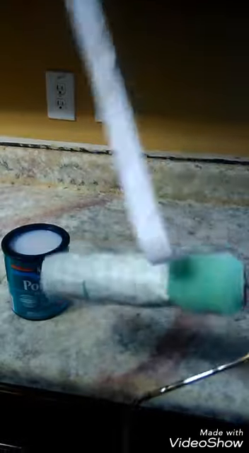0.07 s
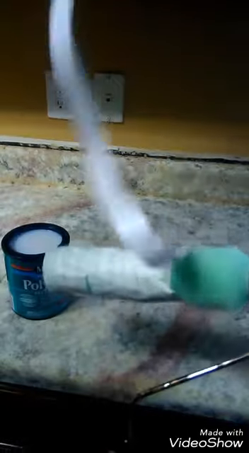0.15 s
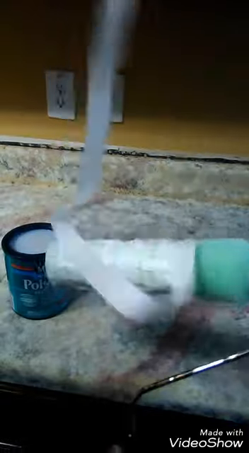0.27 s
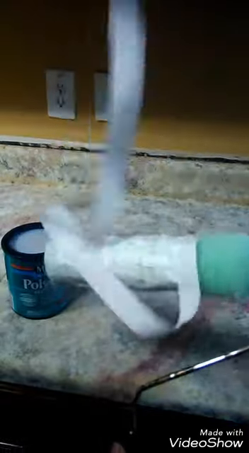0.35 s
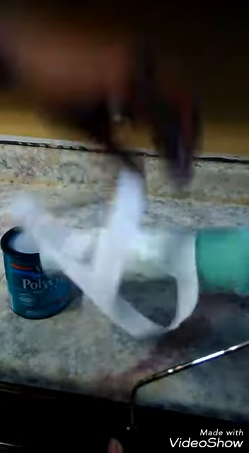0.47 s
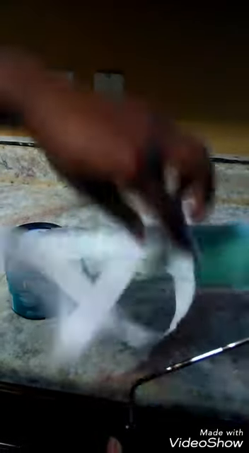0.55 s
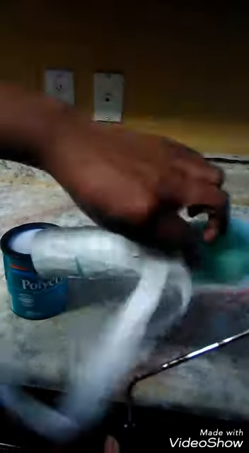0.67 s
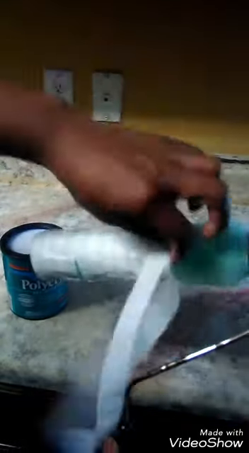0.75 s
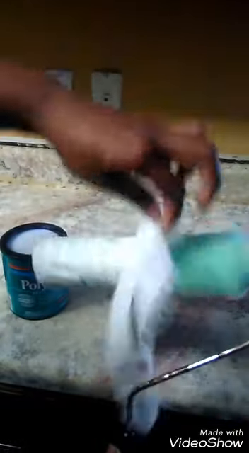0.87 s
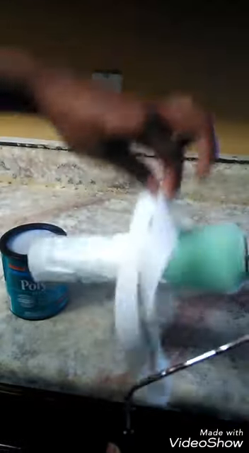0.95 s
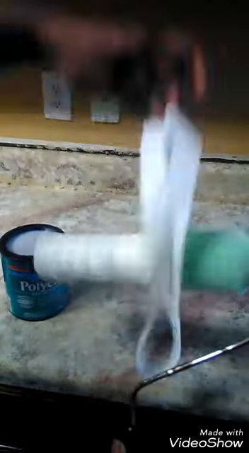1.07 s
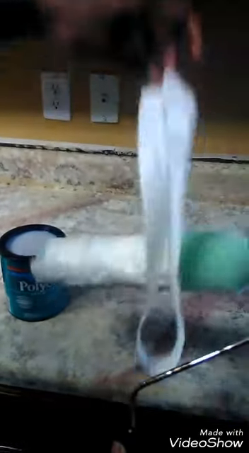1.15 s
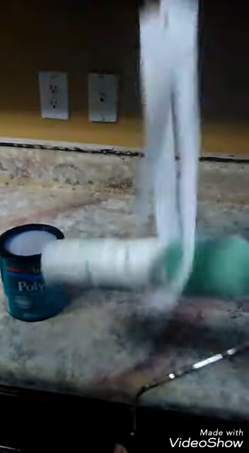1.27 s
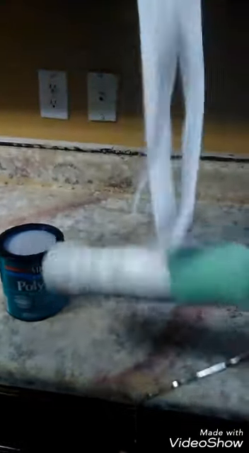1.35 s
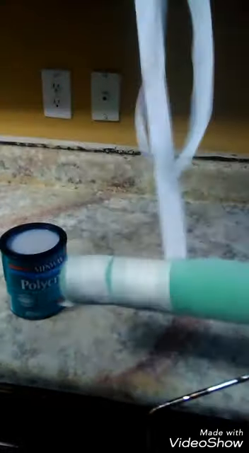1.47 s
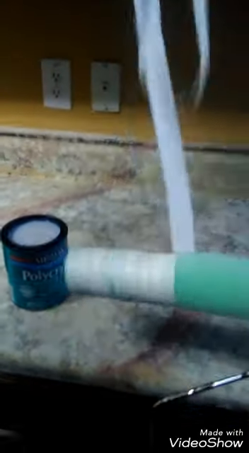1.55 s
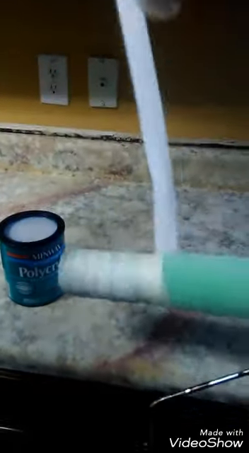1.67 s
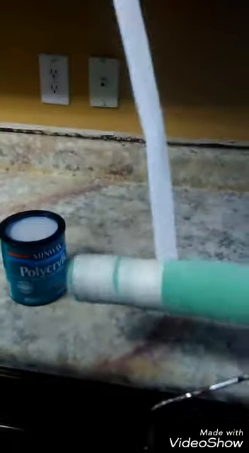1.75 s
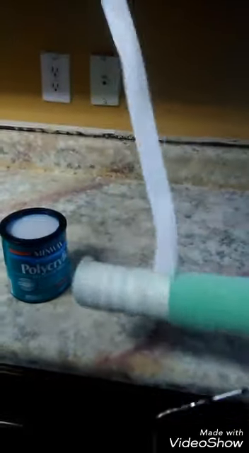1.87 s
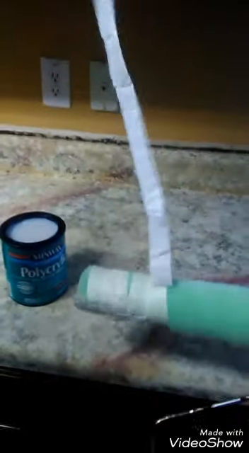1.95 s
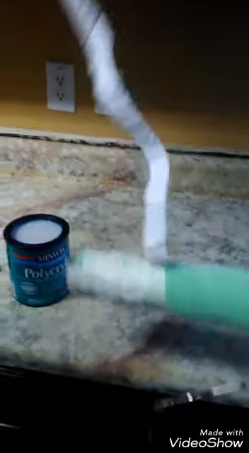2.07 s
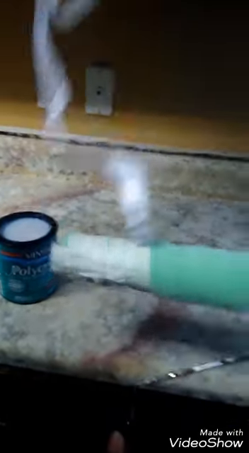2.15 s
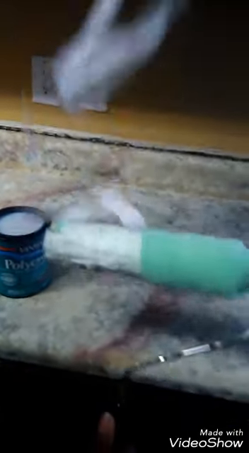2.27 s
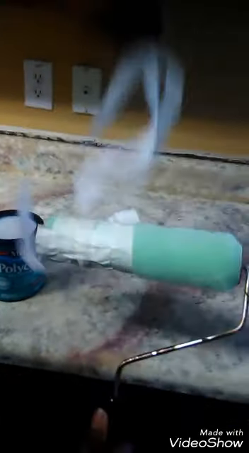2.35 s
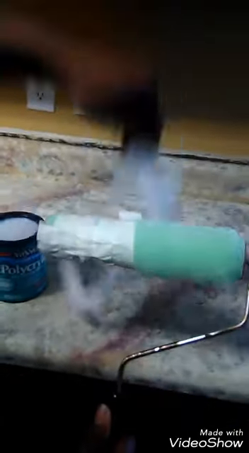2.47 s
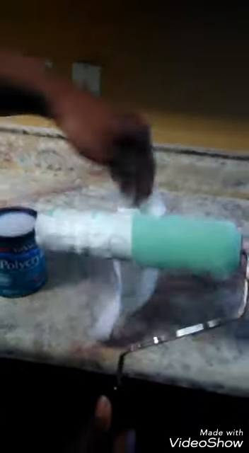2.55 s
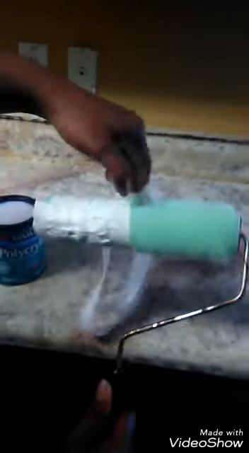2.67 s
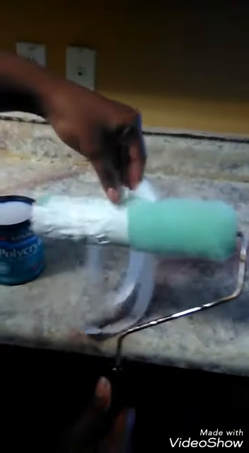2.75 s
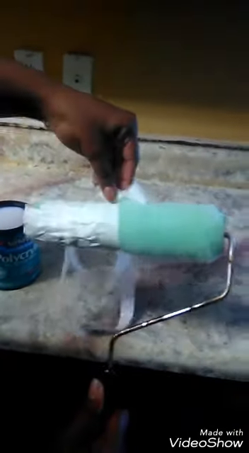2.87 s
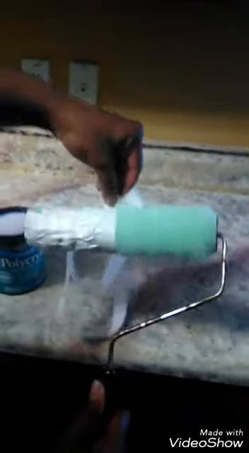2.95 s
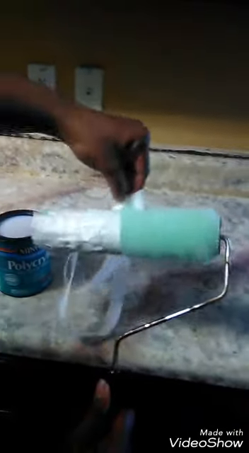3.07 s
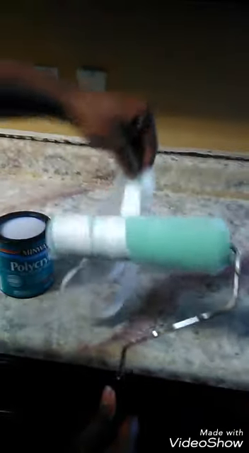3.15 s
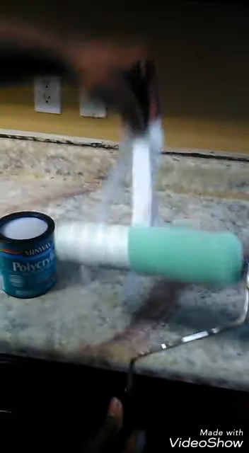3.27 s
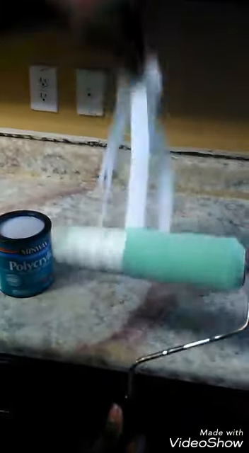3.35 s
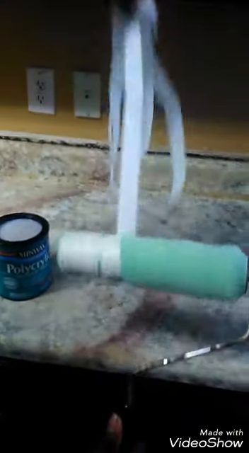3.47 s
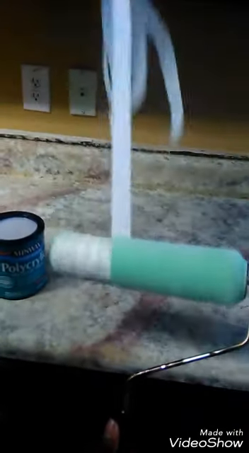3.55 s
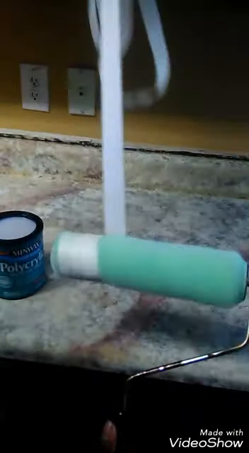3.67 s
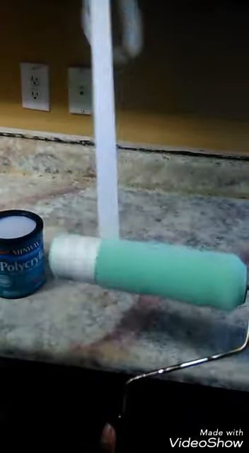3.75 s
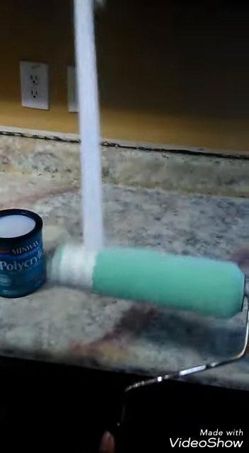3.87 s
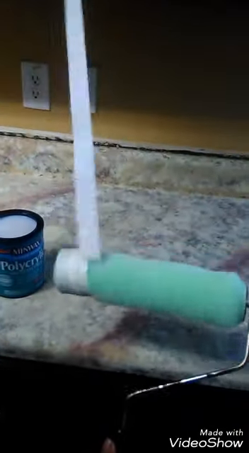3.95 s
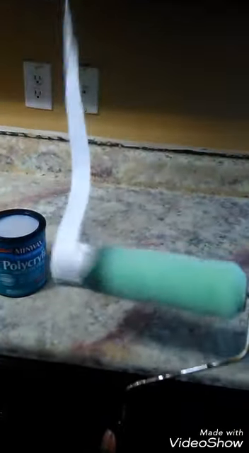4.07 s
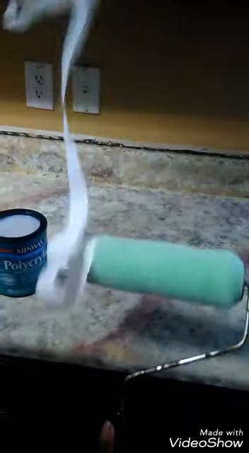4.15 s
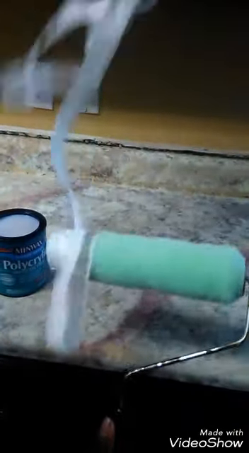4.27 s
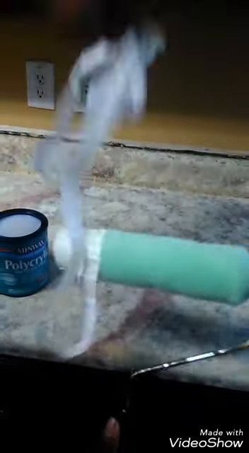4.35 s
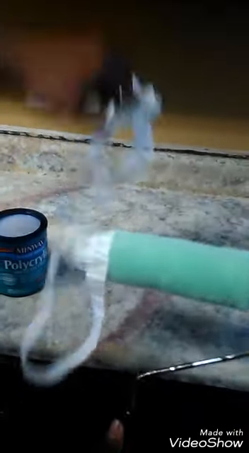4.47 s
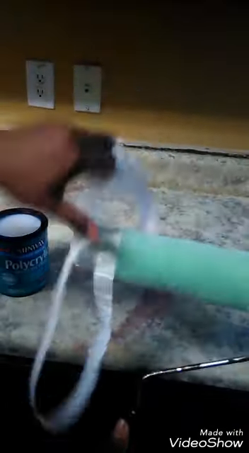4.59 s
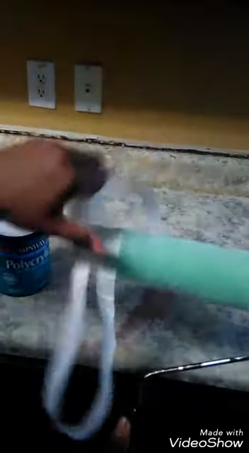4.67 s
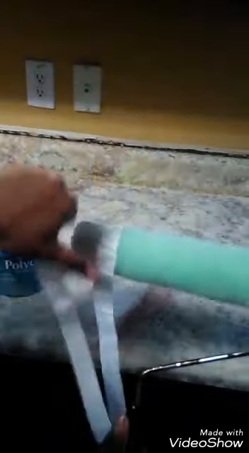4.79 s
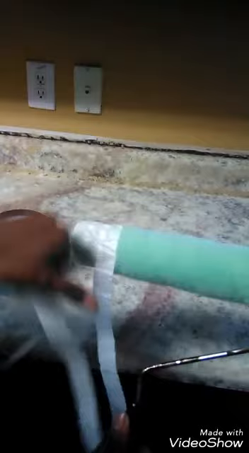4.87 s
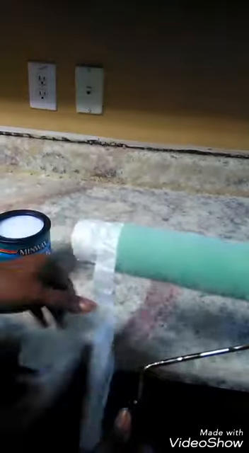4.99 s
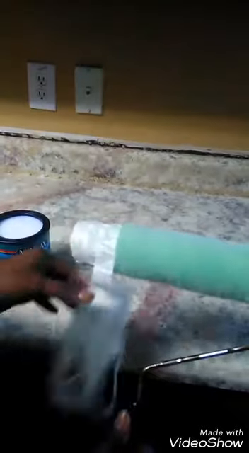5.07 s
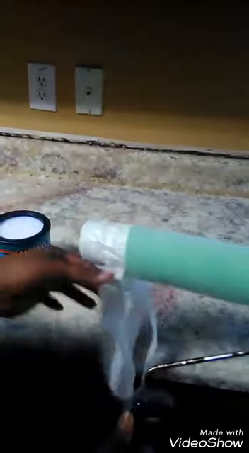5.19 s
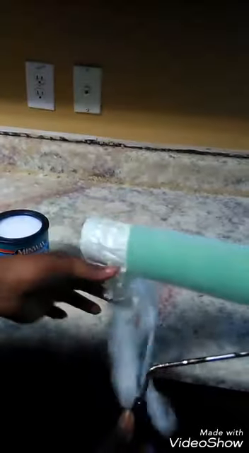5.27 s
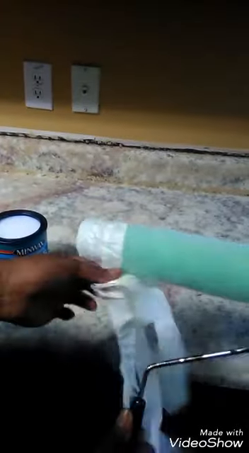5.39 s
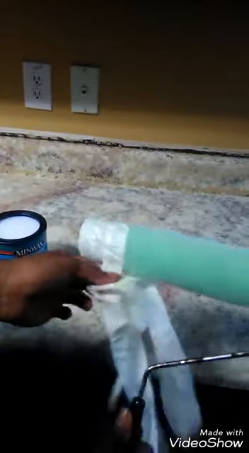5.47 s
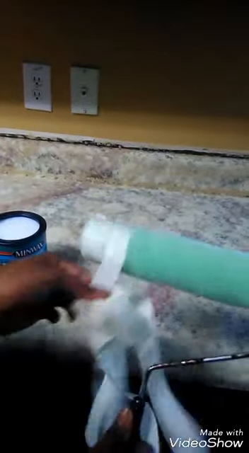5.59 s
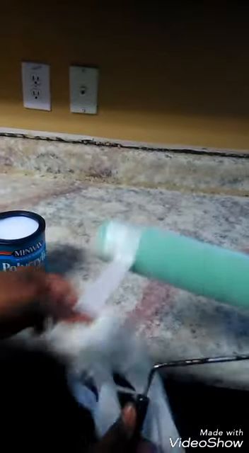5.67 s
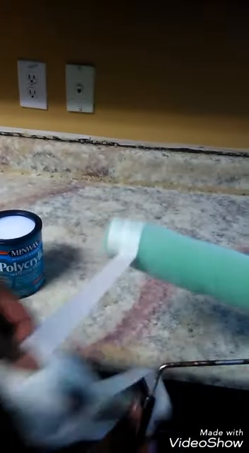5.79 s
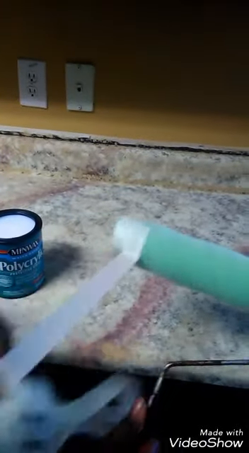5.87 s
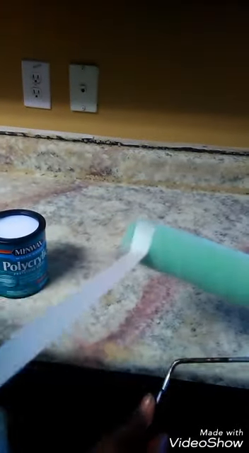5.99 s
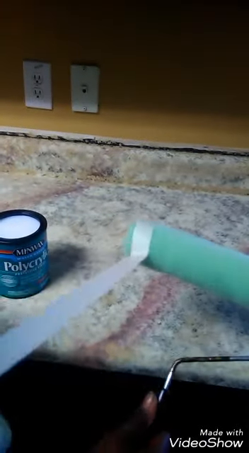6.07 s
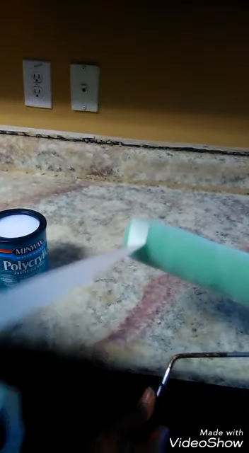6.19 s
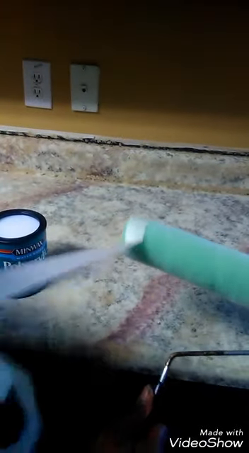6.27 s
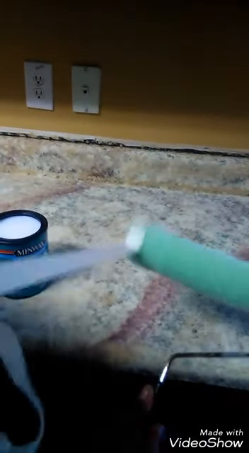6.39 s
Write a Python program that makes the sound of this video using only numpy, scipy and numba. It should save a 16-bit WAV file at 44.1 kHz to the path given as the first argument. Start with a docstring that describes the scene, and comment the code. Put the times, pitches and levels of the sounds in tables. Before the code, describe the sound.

Close up in a small quiet room, adhesive tape is torn from the fluffy cover of a paint roller. A brief rip comes first, then two rasping pulls of nearly a second each, and a last one that runs to the end. Between them, loose tape rustles, ticks and crinkles while the roller knocks softly on its wire frame. Faint hiss lies beneath.

```python
"""Tape is pulled off the fluffy cover of a paint roller in four rasps, the first short, over a counter in a small
quiet room. Nap fibres snap free of the glue in dense, uneven bursts (stick-slip) and excite the resonances of the
hollow core; one effort curve drives each pull. Loose tape rustles and ticks as the hand takes a new grip, with short
hollow notes; creases pop as damped impulses, and the roller knocks, hums and rubs on its wire frame."""
import sys
import numpy as np
from scipy import signal
from scipy.fft import rfft, irfft
from scipy.io import wavfile
from scipy.ndimage import uniform_filter1d
from numba import njit

SR = 44100
rng = np.random.default_rng(int(sys.argv[2]) if len(sys.argv) > 2 else 0)


def int16_out(signal):
    """Quantize to a 16-bit WAV file."""
    q = np.round(np.clip(np.atleast_2d(signal).T, -1, 1) * 32767)
    wavfile.write(sys.argv[1], SR, q.astype(np.int16))


N = 283504
TIME = np.arange(N) / SR


def undb(db):
    """Logarithmic levels: decibels to amplitude gain."""
    return 10 ** (np.asarray(db) / 20)


def unit(x):
    """Normalisation: scale to rms 1."""
    return x / np.sqrt(np.mean(x ** 2))


def colour(x, points):
    """Minimum-phase filtering: the cepstrum is folded so the (f/Hz, level/dB) response is causal."""
    hz, db = np.transpose(points)
    grid = np.fft.rfftfreq(4096, 1 / SR) + 1  # +1 Hz avoids log(0)
    cepstrum = irfft(np.log(undb(np.interp(np.log(grid), np.log(hz), db))))
    cepstrum[1:2048] *= 2
    cepstrum[2049:] = 0
    impulse_response = irfft(np.exp(rfft(cepstrum)))
    return signal.fftconvolve(x, impulse_response)[:len(x)]


def ring(x, hz, width):
    """Simple resonance: a second-order peak with gain 1 at its centre."""
    b, a = signal.iirpeak(hz, hz / width, fs=SR)
    return signal.lfilter(b, a, x)


def resonate(x, modes):
    """Modal superposition: a body's response is the sum of its (f/Hz, width/Hz, level/dB) resonances."""
    return sum(undb(db) * ring(x, hz, width) for hz, width, db in modes)


@njit
def glide(x, hz, width):
    """Time-varying resonance: a state-variable filter whose centre moves."""
    y, band, low = np.empty(len(x)), 0., 0.
    for i in range(len(x)):
        g, k = np.tan(np.pi * hz[i] / SR), width / hz[i]
        v = (band + g * (x[i] - low)) / (1 + g * (g + k))
        band, low, y[i] = 2 * v - band, low + 2 * g * v, k * v
    return y


def wander(rate):
    """Random modulation: normally distributed values joined by straight lines, rate of them a second."""
    return np.interp(TIME * rate, np.arange(N), rng.standard_normal(N))


def crackle(rate, spread_db, count=N):
    """Random impulse process: clicks of either sign and log-normal size, a few of them strong; rms 1."""
    happens = rng.random(count) < rate / SR
    size = undb(spread_db * np.minimum(rng.standard_normal(count), 2.5))
    return unit(happens * size * rng.choice([-1, 1], count) + 1e-12)


def place(x, pan_db):
    """Level-difference stereo: left exceeds right by pan_db."""
    return x * undb(np.array([pan_db, -pan_db]).reshape(2, -1) / 2)


def add(out, s, x):
    """Superposition: mix a short sound in at time s."""
    i = max(int(s * SR), 0)
    out[..., i:i + x.shape[-1]] += x[..., :N - i]


RISE_SHARE, SWELL_DEPTH_DB = 0.41, 23.5  # share of its length a swell rises for; its ends lie this far under its peak


def swells(rows):
    """Power summation: a gain climbs to each (t/s, length/s, level/dB) peak and falls linearly in dB after it."""
    power = np.zeros(N)
    for s, length, db in rows:
        near = slice(max(int((s - length) * SR), 0), int((s + 2 * length) * SR))
        u = (TIME[near] - s) / length
        fall = np.where(u < 0, (u / RISE_SHARE) ** 2, u / (1 - RISE_SHARE))
        power[near] += undb(db - SWELL_DEPTH_DB * fall) ** 2
    return np.sqrt(power)


def limited(gain, limit_db):
    """Saturation: a gain levels off as it nears the limit."""
    return gain / np.hypot(1, gain / undb(limit_db))


def fibres(rate, spread_db, spectrum, shared=0.65):
    """Partial coherence: tiny snaps, some alike in both microphones, others independent in each."""
    both, left, right = (unit(colour(crackle(rate, spread_db), spectrum)) for _ in range(3))
    return shared * both + np.sqrt(1 - shared ** 2) * np.array([left, right])


# resonances of the roller's hollow core: f/Hz, width/Hz, relative level/dB
CORE_MODES = [(146, 37, -27), (197, 140, -0.5), (296, 38, 8), (354.4, 15, 11), (416, 120, 5.5),
              (650, 110, -21), (790, 37, -34.5), (975, 43, -3.5)]


def core(x):
    """Forced vibration: the hollow core rings with whatever shakes it, within a 125-1600 Hz band."""
    band = signal.butter(2, [125, 1600], "band", fs=SR, output="sos")
    return signal.sosfilt(band, resonate(x, CORE_MODES))


# effort, one list for each pull: t/s, level/dB
PULL_EFFORTS = [
    [(0.0, -26), (0.01, -28), (0.076, -34), (0.096, -57), (0.13, -54)],
    [(1.0, -42), (1.012, -45), (1.09, -33), (1.32, -31.5), (1.376, -26.5), (1.554, -29.5), (1.592, -28),
     (1.692, -31), (1.876, -25.5), (1.976, -26.5), (2.022, -28.5), (2.048, -43), (2.12, -75)],
    [(3.06, -38), (3.074, -75), (3.166, -30.5), (3.194, -45), (3.2, -29), (3.452, -33), (3.494, -29),
     (3.586, -30), (3.598, -27.5), (3.822, -35), (4.006, -24.5), (4.06, -38), (4.13, -62)],
    [(5.6, -31), (5.66, -33), (5.718, -26.5), (5.742, -25), (5.862, -30), (6.052, -28), (6.248, -42.5),
     (6.328, -35.5), (6.38, -36.5), (6.429, -30.5)],
]
# strip in each pull: goes taut t/s, goes slack t/s, first note f/Hz, last note f/Hz, roller's note f/Hz,
# rumble level/dB, fizz level/dB, strength of its note level/dB (levels relative)
PULL_STRIPS = [(-.03, 0.093, 232, 210, 347, -17, 0.5, 0), (1.05, 2.03, 215, 185, 371, -15, -1, -1),
               (3.225, 3.997, 405, 180, 421, -14, 1, -5.5), (5.671, 6.43, 415, 231, 352, -11, 1.5, -5.5)]


def efforts():
    """Driving force: the effort in dB, a gate open during the pulls, and the strip's values in the current pull."""
    s, db = np.vstack(PULL_EFFORTS).T
    active = sum((TIME >= pull[0][0]) & (TIME <= pull[-1][0]) for pull in PULL_EFFORTS) > 0
    gate = uniform_filter1d(active * 1., size=900)
    current = sum(TIME >= pull[0][0] for pull in PULL_EFFORTS[1:])
    return np.interp(TIME, s, db), gate, np.array(PULL_STRIPS)[current].T


def pings(count=2600, size=300, cycles=5.6, low_hz=3000, high_hz=10500, spread_db=17.5, scatter_db=22.0):
    """Damped oscillation: single tufts tear free, each with its own pitch, strength and place; rms 1."""
    out, t = np.zeros((2, N)), TIME[:size]
    for when, pitch, strength, across in rng.random((count, 4)):
        hz = low_hz + (high_hz - low_hz) * pitch
        ping = undb(spread_db * strength ** 2) * np.sin(2 * np.pi * hz * t) * np.exp(-t * hz / cycles)
        add(out, when * N / SR, place(ping, scatter_db * (2 * across - 1)))
    return unit(out)


# relative spectra of the fibres' rasp, their treble fizz, the taut strip's drumming and cracking glue strings:
# f/Hz, level/dB
RASP_SPECTRUM = [(100, -39.5), (400, -9.5), (650, -6.5), (1050, -6), (1400, -4.5), (2150, 2.5), (2900, 0),
                 (3800, 2), (4900, -1), (6000, 2), (8000, -12), (14500, -14.5)]
FIZZ_SPECTRUM = [(2000, -73.5), (5000, -10.5), (7000, 0), (9000, 1), (11000, -5), (14500, -11.5)]
DRUM_SPECTRUM = [(200, -43.5), (600, -8), (780, -10.5), (960, -2.5), (1100, 1), (1350, -5.5), (2500, -35.5)]
GLUE_SPECTRUM = [(150, -28.5), (500, -3.5), (1200, -1.5), (3000, 2), (5500, -3.5), (9000, -5),
                 (14500, -11.5)]
USUAL_EFFORT_DB = -29.5
RASP_DB, DRUM_DB, GLUE_DB, TUFT_DB = 0.04, -12.5, -8.5, -7  # against the effort
FIZZ_SLOPE, DRUM_SLOPE, RUMBLE_SLOPE = 0.32, -0.6, -0.6  # dB per dB of extra effort: a hard pull is brighter
TIGHTEN_S, LOOSEN_S, SLACK_DB = 0.013, 0.029, -9  # a slack strip hardly shakes the roller
LENGTHEN_S = 0.048  # the strip's note sinks as the pull lengthens it


def peel(strip_width_hz=130.0, roller_width_hz=83.0):
    """Stick-slip: fibres snap off the glue in tufts that tug at strip and core; returns rasp and rumble."""
    effort_db, gate, strip = efforts()
    taut_s, slack_s, first_hz, last_hz, roller_hz, rumble_db, fizz_db, note_db = strip
    extra_db = effort_db - USUAL_EFFORT_DB
    slackness = np.maximum(1 - (TIME - taut_s) / TIGHTEN_S, (TIME - slack_s) / LOOSEN_S)
    slack_db = SLACK_DB * np.clip(slackness, 0, 1)
    strip_hz = last_hz + (first_hz - last_hz) * np.exp(-np.maximum(TIME - taut_s, 0) / LENGTHEN_S)

    slip = undb(2.0 * wander(420) + 1.0 * wander(70))
    tufts = crackle(750, 2.0)
    rasp = unit(colour(tufts, RASP_SPECTRUM)) + undb(9.0) * fibres(5000, 2.2, RASP_SPECTRUM)
    rasp = unit(slip * rasp) * undb(RASP_DB)
    fizz = unit(colour(tufts, FIZZ_SPECTRUM)) + undb(14.0) * fibres(3000, 1.5, FIZZ_SPECTRUM)
    fizz = unit(slip * fizz) * undb(fizz_db + FIZZ_SLOPE * extra_db)
    drum = fibres(1200, 7.2, DRUM_SPECTRUM) * undb(DRUM_DB + DRUM_SLOPE * extra_db + slack_db / 2)
    glue = unit(colour(crackle(110, 3.5), GLUE_SPECTRUM)) * undb(GLUE_DB)

    # the low body: fixed core modes, plus the notes of strip and roller
    body = unit(core(tufts * slip))
    notes = (strip_hz, strip_width_hz, note_db), (roller_hz.copy(), roller_width_hz, -.6)
    for hz, width, db in notes:
        tugs = crackle(900, 5.0) * slip
        body = body + undb(db) * unit(glide(glide(tugs, hz, width), hz, width))
    # too small to radiate deep bass
    body = signal.sosfilt(signal.butter(4, 125, "high", fs=SR, output="sos"), body)

    pull = gate * undb(effort_db)
    bright = rasp + fizz + drum + glue + pings() * undb(TUFT_DB)
    rumble = unit(body) * undb(rumble_db + RUMBLE_SLOPE * extra_db + slack_db)
    return pull * bright, pull * rumble


# relative spectrum of the background: f/Hz, level/dB
AIR_SPECTRUM = [(20, -2), (60, 12), (130, 6.5), (220, -6.5), (400, -11), (600, -16), (1500, -41),
                (4800, -35), (6500, -19), (8500, -2.5), (11000, -31), (14500, -31.5)]
AIR_DB = -67


def air(swell_db=2.5):
    """Stationary noise: steady microphone hiss, over a faint room rumble that swells unevenly."""
    shared, left, right = (unit(colour(rng.standard_normal(N), AIR_SPECTRUM)) for _ in range(3))
    floor = .9 * shared + np.array([left, right])
    rumble = signal.sosfiltfilt(signal.butter(2, 500, fs=SR, output="sos"), floor)
    return undb(AIR_DB) * (floor + rumble * (undb(swell_db * wander(12)) - 1))


# relative spectrum of crumpling tape: f/Hz, level/dB
RUSTLE_SPECTRUM = [(100, -33), (350, -7), (700, -19), (1500, -8.5), (2300, 1), (3500, 5), (5500, 3),
                   (8000, 0), (14500, -39)]
WRINKLE_DB = -5.5  # against the papery crackle


def crumpling(vary_db=4.5, low_hz=800, high_hz=4500, width=0.31, count=6):
    """Varying resonance: papery crackle changes colour as it folds, and single wrinkles flip over."""
    paper = fibres(1300, 3.3, RUSTLE_SPECTRUM)
    bends = np.zeros((2, N))
    for hz in np.geomspace(low_hz, high_hz, count):
        bends += ring(paper, hz, width * hz) * (undb(vary_db * np.tanh(wander(28))) - 1)
    wrinkles = pings(count=900, size=300, cycles=1.8, low_hz=1800, high_hz=6000, spread_db=18, scatter_db=8)
    return unit(paper + bends) + undb(WRINKLE_DB) * wrinkles


# fixed resonances of the surroundings that colour the fluttering tape: f/Hz, width/Hz, relative level/dB
FLUTTER_RESONANCES = [(1053, 480, -2.5), (1670, 170, -2.5), (2010, 400, -1.5)]


def fluttering(vary_db=4.0):
    """Resonant colouration: short jerks of slack tape sound through fixed resonances of varying strength; rms 1."""
    shake = crackle(400, 3.0)
    flutter = np.zeros(N)
    for hz, width, db in FLUTTER_RESONANCES:
        strength = undb(db + vary_db * np.tanh(wander(40)))
        flutter += strength * ring(ring(shake, hz, width), hz, 2 * width)
    return unit(flutter)


# short hollow notes, of slack tape flapping or the roller turning on its wire axle:
# peak t/s, length/s, pitch f/Hz, level/dB
HOLLOW_NOTES = [(0.363, 0.059, 1440, -54), (0.358, 0.035, 1850, -55), (0.492, 0.027, 913, -54),
                (0.655, 0.11, 663, -65.5), (0.814, .08, 1000, -57), (0.878, 0.046, 1020, -56),
                (2.236, .1, 733, -54.5), (2.275, .07, 723, -67), (2.358, 0.1, 684, -65),
                (2.519, .07, 950, -57.5), (4.122, 0.032, 800, -57), (4.2, .06, 1700, -66),
                (5.288, .06, 1000, -71), (5.366, 0.075, 940, -64), (2.16, 0.15, 970, -67),
                (2.422, 0.1, 910, -60), (2.434, 0.093, 1324, -59.5), (2.436, 0.083, 2080, -58.5),
                (2.596, 0.08, 1290, -53), (2.857, 0.041, 950, -58), (3.398, 0.045, 985, -36.5),
                (4.648, 0.067, 1750, -47), (5.12, 0.33, 900, -69)]
NOTE_WIDTH = 0.11  # width of each resonance stage as a share of the pitch


def hollow_notes():
    """Narrow-band noise: short noisy notes, each with its own set pitch, some sounding together as one."""
    shake = crackle(1500, 2.1)
    out = np.zeros(N)
    for s, length, hz, db in HOLLOW_NOTES:
        width = NOTE_WIDTH * hz
        out += swells([(s, length, db)]) * unit(ring(ring(shake, hz, width), hz, width))
    return out


# loose tape stirred by the hand: peak t/s, length/s, then relative levels: crumpling level/dB,
# sliding hiss level/dB, flutter of slack tape level/dB
TAPE_RUSTLES = [(0.141, 0.14, -47.5, -73, -72), (0.273, .2, -91, -51, -104),
                (0.363, 0.063, -71, -48.5, -56.5), (0.491, 0.11, -53.5, -51.5, -57),
                (0.59, 0.26, -67.5, -58, -98), (0.694, 0.24, -70, -56.5, -79),
                (0.805, 0.13, -49.5, -45.5, -57), (0.826, 0.041, -35, -40, -48),
                (0.905, .08, -48, -50, -54.5), (0.975, 0.14, -37.5, -41, -54),
                (2.105, 0.18, -47, -55.5, -72), (2.272, 0.25, -72, -90, -61),
                (2.509, 0.24, -57, -49.5, -61.5), (2.574, 0.35, -56.5, -58, -69),
                (2.698, 0.13, -40, -42.5, -49.5), (2.804, 0.16, -57.5, -54.5, -84),
                (2.87, 0.084, -57, -50.5, -51), (2.932, 0.15, -39.5, -43, -54),
                (3.022, 0.083, -38, -42, -46.5), (3.121, 0.23, -31.5, -32, -54),
                (4.144, 0.49, -50, -64, -75), (4.25, 0.16, -70, -44.5, -70),
                (4.323, 0.096, -51.5, -44, -76), (4.395, 0.12, -38.5, -40, -78),
                (4.483, 0.085, -31, -40, -59), (4.546, 0.13, -40, -50, -70), (4.635, 0.23, -46, -44, -77),
                (4.71, 0.083, -50.5, -44.5, -71), (4.834, 0.11, -72.5, -52, -82),
                (5.016, 0.2, -66, -54.5, -63.5), (5.126, 0.14, -58.5, -51.5, -60),
                (5.174, 0.057, -55, -55, -55), (5.249, 0.11, -49.5, -52.5, -75),
                (5.3, 0.09, -58, -52.5, -60), (5.365, 0.18, -58.5, -52.5, -82),
                (5.448, 0.16, -57, -52, -67), (5.499, 0.065, -37.5, -43, -54),
                (5.53, 0.093, -51, -58, -47.5), (5.554, 0.035, -36, -38, -32.5),
                (5.592, .04, -40, -45, -54)]
# the hand reaches round to the left for the last grip: t/s, left minus right level/dB
HAND_PANNING = [(4.7, -1), (5.0, 1), (5.35, 5.5), (5.47, 3)]
CRUMPLE_DB, SLIDE_DB, FLUTTER_DB = -3, -0.9, 0  # added to the table's levels
STIR_HISS_DB = -99.5  # the hanging tape is never quite still
JOSTLE_DB, JOSTLE_LIMIT_DB = -16.5, -75.5  # loose tape can give the roller only a light shake


def loose_tape(fold_db=3.0, stir_db=8.0):
    """Friction and buckling: slack tape crumples, flutters, slides over itself and jostles the roller."""
    s, length, *levels_db = np.transpose(TAPE_RUSTLES)
    crumple, slide, flap = (swells(zip(s, length, db)) for db in levels_db)
    stir = undb(stir_db * wander(14))
    folds = undb(fold_db * wander(130))
    rustle = crumpling() * crumple * undb(CRUMPLE_DB)
    flutter = fluttering() * flap * undb(FLUTTER_DB)
    hiss_gain = np.hypot(slide * undb(SLIDE_DB), stir * undb(STIR_HISS_DB))
    hiss = fibres(4100, 3.2, FIZZ_SPECTRUM) * hiss_gain
    jostle_gain = limited(np.hypot(crumple, slide) * undb(JOSTLE_DB), JOSTLE_LIMIT_DB)
    jostle = unit(core(crackle(300, 1.9))) * jostle_gain
    pan_db = np.interp(TIME, *np.transpose(HAND_PANNING))
    return place(folds * (rustle + flutter + hiss) + hollow_notes(), pan_db), jostle


# the dragging hub sets the core's main note humming: peak t/s, length/s, level/dB
CORE_HUMS = [(.14, 0.19, -51.5), (.4, 0.078, -63.5), (2.6, .12, -67), (4.12, 0.09, -53.5),
             (3.07, 0.067, -50), (5.325, 0.099, -52.5)]


def hum(hz=350, waver=0.0494):
    """Frequency modulation: the core's main note wavers slightly as the hub drags."""
    phase = 2 * np.pi * np.cumsum(hz * (1 + waver * wander(40))) / SR
    return swells(CORE_HUMS) * np.sqrt(2) * np.sin(phase)


# creases popping and stuck spots letting go: t/s, relative level/dB of the first 3 ms, centre f/Hz,
# left minus right level/dB, crinkle level/dB against the crack, crinkle decay/ms
CREASE_SNAPS = [(.0064, -26, 4120, 9, -3, 6), (0.222, -48.5, 7860, 4, -1, 11),
                (0.284, -60, 7000, 6, 2, 8.7), (0.3582, -48, 8100, -17, 2, 6),
                (0.359, -52.5, 2600, -8, 6, 6.6), (0.487, -40, 7550, 3, -18, 2.5),
                (.4875, -44.5, 2400, 0, -1, 4), (0.648, -57, 3130, -2, 7, 10),
                (0.7074, -41.5, 9100, -1, -14, 6), (0.772, -55, 8750, 11, 3, 8),
                (0.8269, -31, 3300, 6, 5, 4.2), (0.8688, -37.5, 2330, 3.5, -16, 3),
                (0.871, -43, 4060, 2, -16, 3), (0.9356, -31, 2900, 0, -3, 3.6),
                (0.9365, -35, 8750, 3, -1, 4), (.9405, -41, 8600, 4, -9, 2.4),
                (1.311, -28, 3000, -11, 3, 4.5), (1.368, -23, 4770, -9, -16, 2.9),
                (1.664, -23, 2600, 0, -3, 6), (1.704, -29, 3000, 5, 1, 5.1),
                (1.7704, -21.5, 3700, 0, -17, 6), (1.9297, -16, 8500, -3, 3, 9.4),
                (1.966, -12, 7860, 5, -3, 6), (2.0243, -15.5, 7650, 1, -17, 4.6),
                (2.253, -64, 3300, 10, 3, 8.9), (2.325, -41.5, 8900, 0, -8, 11),
                (2.431, -61, 3000, 0, 5, 10), (2.467, -43, 8750, 5, -4, 5), (2.483, -60, 2500, 0, -2, 5.7),
                (2.476, -36.5, 8450, -2, 1, 14), (2.661, -35, 8800, 5, -14, 3), (2.679, -41, 5100, 0, 0, 8),
                (2.8985, -39.5, 7900, -3, 4, 6.7), (2.9178, -36, 3300, 5, -5, 6.7),
                (2.975, -43, 2960, 2, -10, 5), (3.005, -36, 8100, -2, 1, 6),
                (3.0097, -33.5, 3060, 5, -2, 8.6), (3.072, -30, 9000, -1, -8, 7),
                (3.1005, -30, 3180, -4, -14, 4.3), (3.1207, -29, 3430, -1, -19, 2.9),
                (3.128, -20.5, 9100, 1, -2, 4.6), (3.1378, -29, 3620, 5.5, -14, 3.6),
                (3.152, -18, 9500, 2, 14, 2.3), (3.1529, -24, 2980, 7.5, -8, 3),
                (3.165, -25.5, 3200, -6, 6, 4.3), (3.171, -22.5, 3400, 3, -3, 6),
                (3.1986, -22, 5260, 7, -17, 11), (3.975, -33, 2230, 3, -10, 3.2),
                (4.1928, -44, 8500, -17, -26, 4), (4.221, -41, 7600, -11, -15, 6),
                (4.295, -35, 7700, -1, -12, 4), (4.375, -30, 6200, 2.5, -3, 6),
                (4.4749, -20.5, 8700, -2, -12, 5.5), (4.605, -50, 6700, 3, -13, 5),
                (4.7, -47.5, 3260, -4, 4, 6), (4.811, -63, 8000, -3, -3, 7.3),
                (4.971, -50, 7860, 9, -1, 9.3), (5.012, -45.5, 8900, 1, 11, 4.9),
                (5.0686, -53, 9100, -4, -18, 5.1), (5.167, -48, 6840, 6, 2, 11),
                (5.484, -27.5, 2800, 0, -7.5, 8.2), (5.4838, -24.5, 7800, -1, -2, 4),
                (5.5491, -25.5, 6560, 0, 0, 4), (5.5816, -27, 8000, 0, -18, 2),
                (5.593, -22, 7700, -5, -20, 2), (5.622, -40, 5000, -6, -4, 3),
                (5.627, -33, 3840, -5, -9, 3), (5.65, -34, 5500, -2, -10, 3),
                (5.6861, -21, 3280, -9, -17, 4.8), (5.72, -25, 6030, 0, -2, 5),
                (5.7425, -23, 6500, -3, -4, 3.4), (6.0062, -29, 3480, -7, -1, 6.6)]
# relative spectrum of a crease: f/Hz, level/dB
CREASE_SPECTRUM = [(100, -23.5), (400, 16.5), (1500, 11), (3500, 14), (9000, 16), (14500, 14.5)]


def snaps(crack_cycles=1.45, width=0.71, broad=0.21, count=4000, size=130):
    """Impulse response: a crease pops, longer the lower its pitch, and the tape round it crinkles briefly."""
    out, t = np.zeros((2, N)), TIME[:count]
    for s, db, hz, pan_db, crinkle_db, crinkle_ms in CREASE_SNAPS:
        crack = rng.choice([-1, 1], count) * t * np.exp(-2 * t * hz / crack_cycles)
        crinkle = crackle(5000, 6.9, count=count) * np.exp(-1000 * t / crinkle_ms)
        force = colour(crack / np.std(crack[:size]) + undb(crinkle_db) * crinkle, CREASE_SPECTRUM)
        pop = ring(ring(force, hz, width * hz), hz, width * hz) + broad * force
        add(out, s + .001, place(pop / np.std(pop[:size]) * undb(db), pan_db))
    return out


# resonances of the wire frame: f/Hz, width/Hz, relative level/dB
FRAME_MODES = [(342, 110, -14.5), (705, 190, 8.5), (897, 89, 1.5), (1230, 64, -16.5), (2050, 720, -9)]
# the roller jolting on its frame: t/s, peak level/dB before panning and room, ring of the frame against the
# core's level/dB, contact/ms (the push peaks halfway)
ROLLER_KNOCKS = [(.0065, -17, -3, 0.2), (.032, -21, 27, 0.1), (0.1083, -23, 5, 0.32), (.489, -47, 0, 0.16),
                 (.958, -33, 12, 0.32), (1.367, -17.5, 17, 0.091), (1.768, -27, 4, 0.29),
                 (2.576, -43, -6, 1.6), (3.038, -40.5, -26, 0.3), (3.989, -23.5, -7, 0.22),
                 (4.475, -42.5, -19, 0.65), (5.5473, -31, -3, 0.14), (5.684, -34, -23, 0.27)]


def knocks(count=8000):
    """Impact excitation: the roller takes up the play on its axle; hollow core and wire frame ring together."""
    out, t = np.zeros(N), TIME[:count]
    for s, db, wire_db, contact_ms in ROLLER_KNOCKS:
        push = t * np.exp(-2000 * t / contact_ms)
        hollow, wire = core(push), resonate(push, FRAME_MODES)
        knock = hollow / np.abs(hollow).max() + undb(wire_db) * wire / np.abs(wire).max()
        add(out, s, knock / np.abs(knock).max() * undb(db))
    return out


def held_back(hold_db=1.5, hold_s=0.01):
    """Static friction: before a stuck spot lets go or the roller jolts, the tape stands taut and quieter; a gain."""
    dip = np.zeros(N)
    for s, *_ in CREASE_SNAPS + ROLLER_KNOCKS:
        before = np.arange(int(s * SR) + 1)[-2000:]
        dip[before] = np.maximum(dip[before], np.exp((TIME[before] - s) / hold_s))
    return undb(-hold_db * dip)


# the freely turning roller rubs on its wire axle about once a turn: peak t/s, length/s, relative level/dB
AXLE_RUBS = [(2.25, 0.17, -61), (2.42, 0.14, -65), (2.605, 0.11, -53.5), (2.79, 0.3, -64.5),
             (2.93, .16, -66), (3.05, .14, -73)]


def axle(rub_db=3.0):
    """Friction excitation: the hub rubs unevenly on the wire frame, waking now one resonance, now another."""
    rub = crackle(500, 7.1)
    rung = np.zeros(N)
    for hz, width, mode_db in FRAME_MODES:
        strength = undb(mode_db + 2 * wander(21.24) + 2 * wander(29.7))
        rung += strength * ring(ring(rub, hz, 0.49 * width), hz, 0.63 * width)
    return swells(AXLE_RUBS) * undb(rub_db) * unit(rung)


# first echoes from counter and wall: left delay t/ms, right delay t/ms, level/dB against the direct sound
FIRST_ECHOES = [(.48, 0.59, -21.5), (1.25, 1, -43.5)]


def room(x, wet_db, alike, near_db, near_s=0.0057, t60=0.22, steady=0.078, size=2000, count=11000):
    """Reverberation: direct sound, first echoes, close scatter and a short tail; paths change as hand and tape move."""
    t = TIME[:count]
    scatter = unit(np.exp(-t / near_s) * (t > .0004)) * undb(near_db)
    tail = unit(np.exp(-np.log(1000) * t / t60) * (t > .004)) * undb(wet_db)
    diffuse = np.hypot(scatter, tail) / np.sqrt(count)
    direct = np.zeros((2, count))
    direct[0, 1] = direct[1, 0] = 1  # the right microphone is slightly nearer
    for side in range(2):
        for *ms, db in FIRST_ECHOES:
            add(direct[side], ms[side] / 1000, np.array([undb(db)]))
    # overlapping blocks, each with partly new paths
    padded = np.pad(x, ((0, 0), (size, 2 * size)))
    out = np.zeros((2, N + 4 * size + count))
    fade = np.sin(np.pi * np.arange(2 * size) / (2 * size)) ** 2
    walls = rng.standard_normal((3, count))
    for i in range(0, N + size, size):
        paths = np.sqrt(steady) * walls + np.sqrt(1 - steady) * rng.standard_normal((3, count))
        response = direct + diffuse * (np.sqrt(alike) * paths[2] + np.sqrt(1 - alike) * paths[:2])
        heard = signal.fftconvolve(padded[:, i:i + 2 * size] * fade, response, axes=1)
        out[:, i:i + heard.shape[1]] += heard
    return out[:, size:size + N] / np.sqrt(1 + np.sum(diffuse ** 2))


SNAP_ROOM_DB, SNAP_DIRECT_DB = -2.5, -12  # creases pop facing the microphones, so they sound drier than the rasp


def scene():
    """Spatial coherence: the tape reaches the microphones diffusely, the roller's notes more alike."""
    rasp, rumble = peel()
    rustle, jostle = loose_tape()
    held = held_back()
    pops = snaps()
    tape = held * (rasp + rustle) + pops * undb(SNAP_ROOM_DB)
    roller = place(held * rumble + jostle + knocks() + axle() + hum(), pan_db=1.0)
    tape = room(tape, wet_db=-1.5, alike=0.0094, near_db=-1.0)
    roller = room(roller, wet_db=2.0, alike=0.65, near_db=-3.5)
    return tape + roller + pops * undb(SNAP_DIRECT_DB) + air()


# how much more the left microphone picks up: f/Hz, level/dB
MICROPHONE_DIFFERENCE = [(100, -2), (380, 1), (700, 1.5), (1300, -1.5), (2400, -0.5), (4400, 4.5),
                         (8000, 3), (13000, -1)]
TOP_HZ = 14250


def record(dry, ceiling_db=-13.5):
    """Transducer response: microphones of unlike colour, soft saturation of peaks, then a steep low-pass."""
    heard = []
    for channel, sign in zip(dry, (1, -1)):
        response = [(hz, sign * db / 2) for hz, db in MICROPHONE_DIFFERENCE]
        heard.append(colour(channel, response))
    heard = np.array(heard)
    heard = heard / (1 + (heard / undb(ceiling_db)) ** 4) ** .25
    return signal.sosfilt(signal.ellip(10, .2, 70, TOP_HZ, fs=SR, output="sos"), heard)


dry = scene()
out = record(dry)
int16_out(out)
```